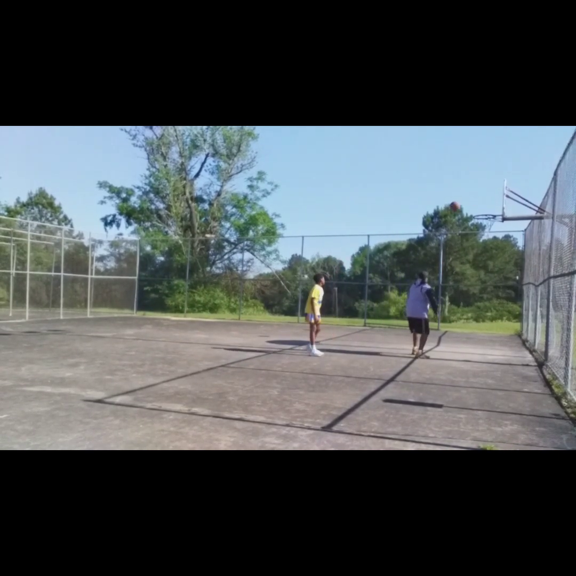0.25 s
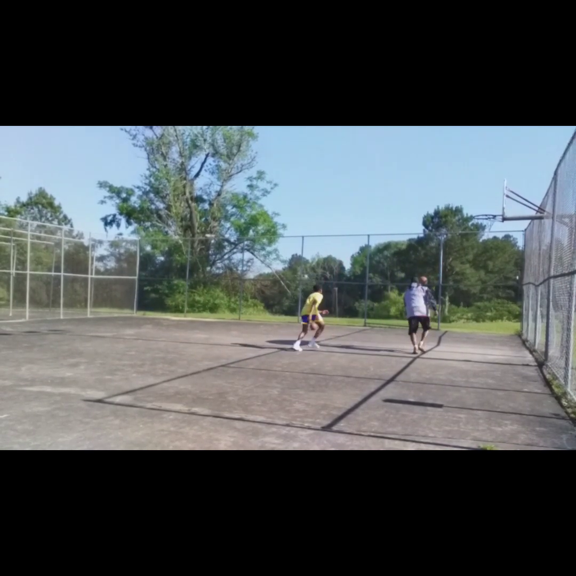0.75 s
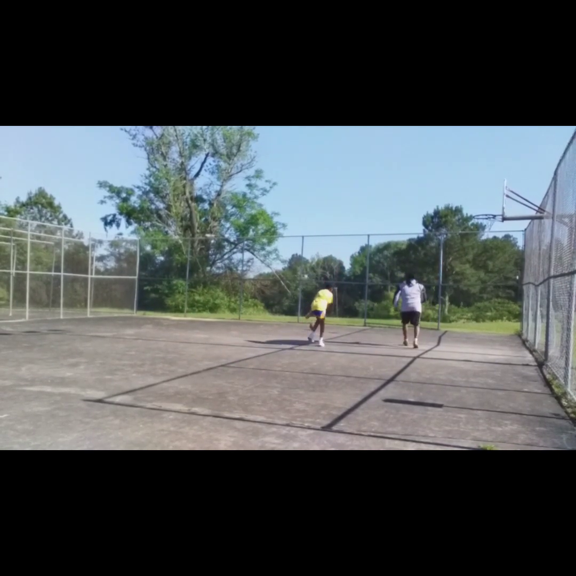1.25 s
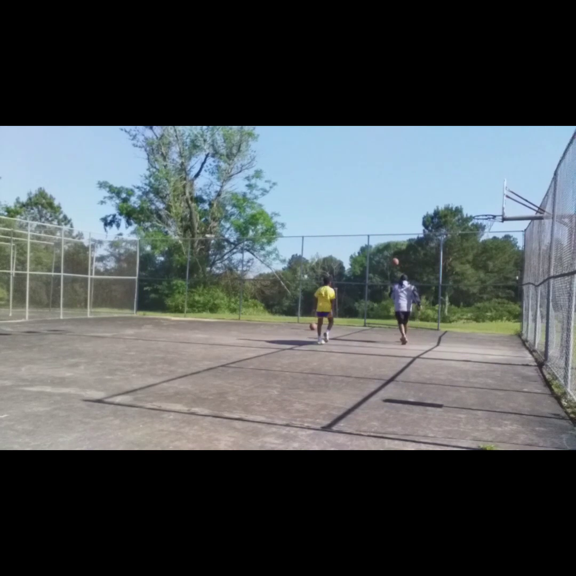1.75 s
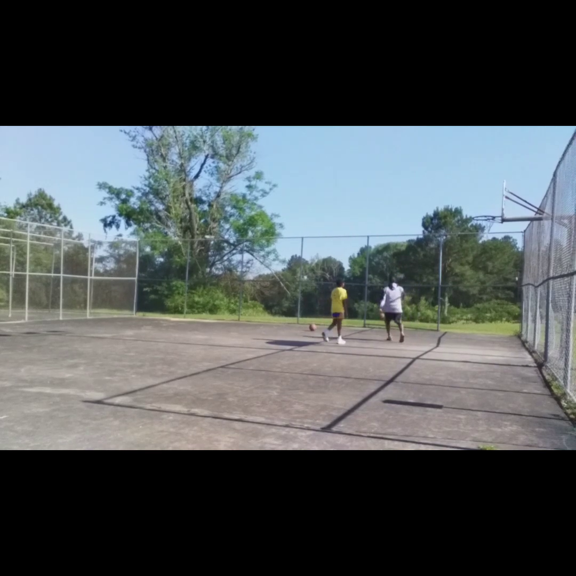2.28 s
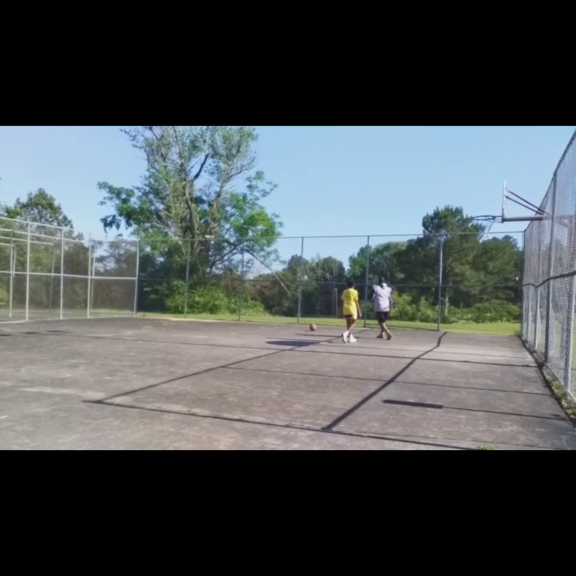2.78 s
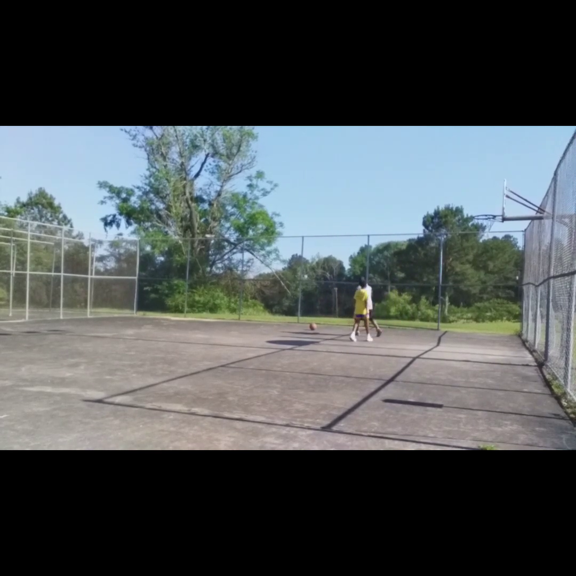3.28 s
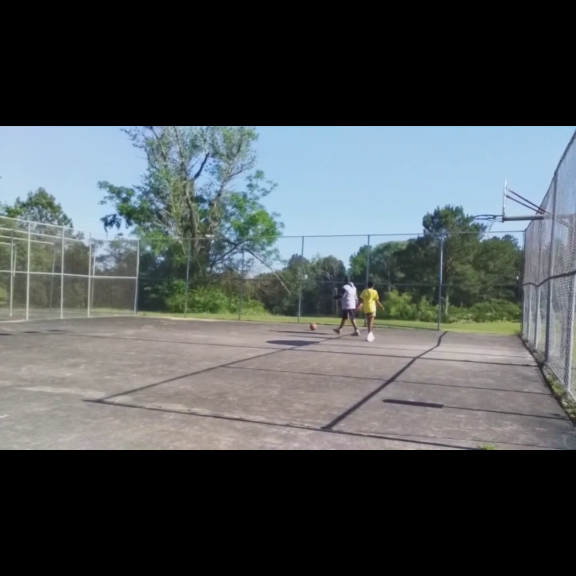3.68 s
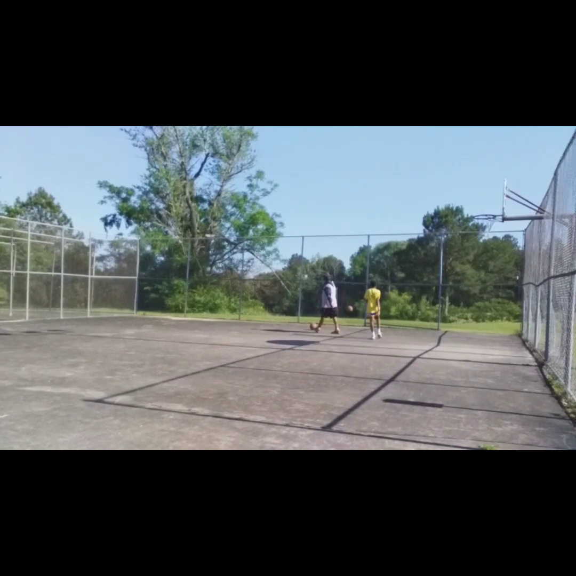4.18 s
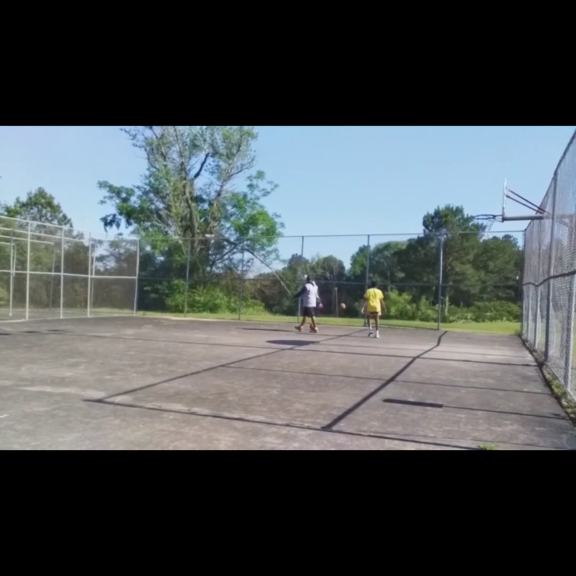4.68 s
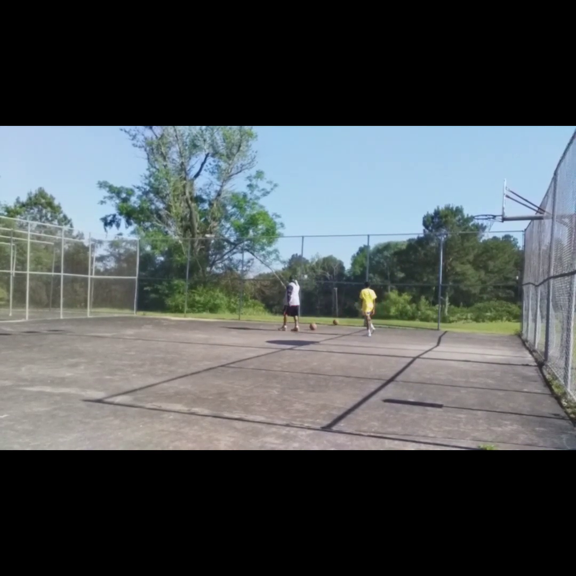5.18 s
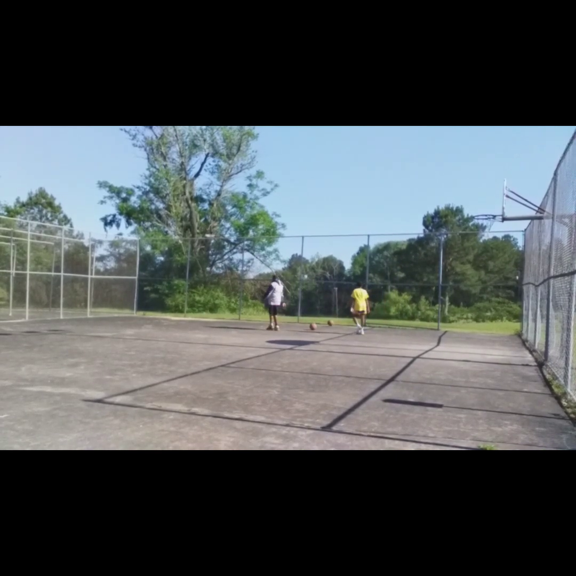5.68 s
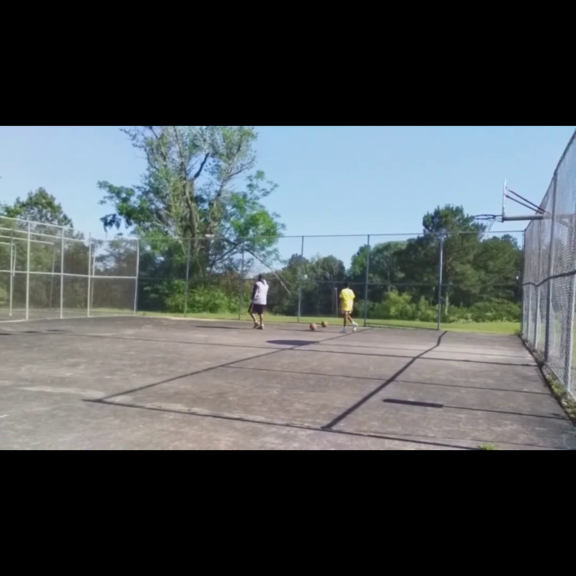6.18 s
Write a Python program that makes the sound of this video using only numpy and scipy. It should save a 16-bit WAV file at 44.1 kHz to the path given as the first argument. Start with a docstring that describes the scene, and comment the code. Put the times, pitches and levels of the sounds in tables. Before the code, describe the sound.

A distant microphone on an open court picks up light wind rumble and a fading rim hum. Sneakers grind sand briefly, then a basketball slaps concrete hard, with a quick echo and a faint shiver of wire fence. Strong wind thuds cover the middle, where three weaker bounces sound, the last the dullest. Quiet bird whistles and chirps close the scene.

```python
"""Basketballs bounce and sneakers scuff grit on an outdoor concrete court, under gusts and distant whistles.
Impacts excite the damped modes of ball, hoop and wire fence; soles release trains of tiny random cracks.
Wind is coloured noise plus a stream of eddies passing the microphone; birds are gliding pure tones.
A hard surface returns one slap echo of balls and soles, and diffuse scatter adds a faint tail."""
import sys
import numpy as np
from scipy import signal
from scipy.fft import rfft, irfft, next_fast_len
from scipy.io import wavfile

SR = 44100
rng = np.random.default_rng(int(sys.argv[2]) if len(sys.argv) > 2 else 0)


def master(y):
    """Save y as 16-bit WAV."""
    cut = np.clip(np.atleast_2d(y).T, -1, 1)
    pcm = np.round(cut * 32767)  # scale
    wavfile.write(sys.argv[1], SR, pcm.astype(np.int16))


N = 283861


def balls():
    """Impact excitation: a short contact force sets the shell and the enclosed air into damped modes."""
    # bounces; relative levels of each part: [start_s, smack_db, thump_db, grit_tick_db, early_db, echo_db]
    bounce_rows = [(1.068, -22.5, -33.5, -37, -14, -34), (1.1078, -11, -17.5, -16, -14.5, -4.5),
                   (2.4911, -20.5, -21, -23.5, -12, -4.5), (3.6159, -25.5, -27, -43.5, -4, -2.5),
                   (4.4901, -31, -27, -31.5, -15, -7.5)]
    # air and shell modes of the ball: [frequency_hz, level_db, t60_s]
    ball_modes = [(324.3, -13.5, 0.069), (398, -13.5, 0.093), (800, -8, 0.033), (921, -11, 0.042),
                  (1157, -16.5, 0.035), (1454, -32, 0.047), (1800, -31, 0.049), (2010, -16, 0.014),
                  (2750, -21, 0.019), (3790, -19.5, 0.021)]
    # colour of rubber slapping concrete: [frequency_hz, level_db]
    smack_colour = [(100, -12), (550, 3), (1000, 16.5), (2000, 3), (3300, -9.5), (4300, -38.5),
                    (6000, -17.5), (10000, -14.5), (16000, -31)]
    # colour of the grit under the ball: [frequency_hz, level_db]
    tick_colour = [(300, -75), (3000, -51), (6500, -2), (8800, 5.5), (10000, 15), (11500, 11.5),
                   (13500, -8), (16000, -18.5)]
    # colour of the scatter that follows a bounce: [frequency_hz, level_db]
    scatter_colour = [(100, -29.5), (250, -4.5), (600, -1.5), (1000, -1.5), (2000, -3.5), (2900, -10.5),
                      (4000, 0.5), (10000, -1), (15000, -13.5)]
    shell_t60_s, thump_t60_s, thump_hz = 0.028, 0.034, 136

    t = np.arange(SR // 4) / SR
    smack, tick = click(smack_colour), click(tick_colour)
    direct, thrown = np.zeros(N), np.zeros(N)
    for s, smack_db, thump_db, tick_db, early_db, echo_db in bounce_rows:
        detune = 1 + 0.039 * rng.standard_normal(len(ball_modes))
        tilt_db = 0.33 * (smack_db + 17)  # per octave: soft blows wake the high modes less
        ring = np.zeros(len(t))
        for (hz, db, t60), factor in zip(ball_modes, detune):
            start_db = smack_db - 9 + db + tilt_db * np.log2(hz / 1000)
            ring += amp(start_db - 60 * t / t60) * np.sin(2 * np.pi * hz * factor * t)

        # the shell's many close modes merge into a short noise
        shell, grit = rng.standard_normal((2, len(t)))
        ring += through(shell * amp(smack_db - 14 - 60 * t / shell_t60_s), smack)

        grit_decay = np.exp(-t / 0.0012) + 0.13 * np.exp(-t / 0.0091)
        ring += amp(tick_db - 13) * through(grit * grit_decay, tick)

        swell = 1 - np.exp(-t / 0.0015)  # the shell flattens, then springs back
        thump = amp(thump_db + 9 - 60 * t / thump_t60_s) * np.sin(2 * np.pi * thump_hz * t)
        ring += swell * thump

        contact = t / (0.00006 * amp(-0.6 * (smack_db + 8.5)))  # harder blows make a shorter spike
        hit = -amp(smack_db - 3.5) * contact * np.exp(1 - contact)
        add(hit, 0, -amp(smack_db + 0.5) * smack)
        add(hit, 0.0003, ring)

        add(direct, s, hit)
        add(direct, s + rng.uniform(0.0085, 0.009), amp(early_db) * hit)  # early reflection
        add(thrown, s, amp(echo_db) * hit)

    high_pass = signal.butter(2, 70, "high", fs=SR, output="sos")
    both = signal.sosfilt(high_pass, direct + slap(thrown))
    scattered = through(both, click(scatter_colour))
    return both + amp(-12) * surroundings(scattered, t60=0.35, treble_t60=0.42, build_s=0.016)


def sneakers():
    """Stick-slip friction: soles drag sand in dense tiny cracks, with a coarser scrape under weight."""
    # shoe scuffs; heavy_db is the heavy scrape relative to the sand: [start_s, length_s, level_db, heavy_db]
    scuff_rows = [(-.02, 0.039, -58.5, -18), (.522, .075, -65, 2), (0.691, .02, -39, -0.5),
                  (.742, 0.015, -53, 2), (0.786, 0.064, -25, 3.5), (0.981, 0.043, -42, -2.5),
                  (1.023, 0.049, -51.5, -1), (1.199, 0.009, -39.5, -3.5), (1.226, 0.019, -37, -10),
                  (1.358, 0.045, -50, 6), (1.391, .039, -38, -3.5), (1.844, .006, -63.5, 3.5),
                  (1.869, 0.058, -68, 0), (2.226, 0.025, -54.5, -0.5), (2.286, 0.019, -46, -15),
                  (2.5, 0.006, -54, 0), (2.703, 0.051, -58, -7), (3.275, 0.018, -56.5, -7),
                  (3.81, .11, -71.5, 5.5), (4.404, 0.031, -66, -4), (4.492, 0.082, -62, -10),
                  (4.907, 0.051, -65.5, -10), (5.17, 0.11, -60.5, -4), (5.29, 0.042, -66.5, -4),
                  (5.367, 0.14, -66.5, 1)]
    # colour of sand hissing under a sole: [frequency_hz, level_db]
    sand_colour = [(500, -23), (4000, -25.5), (8000, -12), (9000, -7), (9900, 5), (11200, 4), (12400, -6.5),
                   (13800, -16.5), (15500, -22)]
    # colour of a loaded sole's scrape: [frequency_hz, level_db]
    scrape_colour = [(150, -18.5), (800, -17), (1300, -7), (1800, 0.5), (2300, -3), (3050, 1),
                     (3550, -10.5), (4300, -3), (7000, -6.5), (10000, 2.5), (12400, 5.5), (14000, 1.5),
                     (16000, -8)]
    rise_share, trail_share = 0.27, 0.61  # attack, and a light sole's added release, as shares of length
    stop_s = 0.0036  # release of a planted sole
    planted_db, light_db = -48, -59.5  # above the first soles stop dead; below the second they trail off
    cracks_per_s = 16000

    t = np.arange(N) / SR
    light, heavy = np.zeros(N), np.zeros(N)
    for s, length, db, heavy_db in scuff_rows:
        lightness = np.clip((planted_db - db) / (planted_db - light_db), 0, 1)
        fade = stop_s + trail_share * length * lightness
        stroke = amp(db) * envelope(s, length, rise_share * length, fade)
        weight = np.clip((t - s) / (0.62 * length), 0, 1)  # weight comes on gradually
        light += stroke
        heavy += stroke * amp(heavy_db) * weight

    cracks = rng.standard_normal((2, N)) * (rng.random((2, N)) < cracks_per_s / SR)
    cracks *= amp(1.8 * np.minimum(rng.exponential(1, (2, N)), 4))  # a few cracks are much larger
    sand = through(light * unit(cracks[0]), click(sand_colour))
    scrape = through(heavy * unit(cracks[1]), click(scrape_colour))
    catch = amp(2.3 * drift(180))  # the sole grips and slips
    dry = catch * amp(-3) * (sand + scrape)
    tail = surroundings(dry, t60=0.33, treble_t60=0.25, build_s=0.0065)
    return dry + amp(-13.5) * slap(dry) + amp(-12.5) * tail


def fence(x, t60=0.45, rattle_db=3):
    """Sympathetic resonance: incoming sound sets the chain-link wires ringing in a few loose bands."""
    # resonance bands of the wires: [centre_hz, width_hz, level_db]
    wire_bands = [(1950, 343, -31), (2450, 250, -23), (2860, 140, -16)]
    t = np.arange(SR // 2) / SR
    hz = np.fft.rfftfreq(len(t), 1 / SR)
    bands = sum(amp(db) * np.exp(-((hz - centre) / width) ** 2) for centre, width, db in wire_bands)
    rattle = amp(rattle_db * drift(40)[:len(t)])  # loose wires knock in clusters
    build_up = 1 - np.exp(-t / 0.037)
    shiver = rattle * rng.standard_normal(len(t)) * amp(-60 * t / t60) * build_up
    response = irfft(rfft(shiver / np.linalg.norm(shiver)) * bands, len(t))
    return through(x, response)


def wind(count=1200, eddy_hz=92, size_spread_db=4.0):
    """Turbulent pressure: a rumble and a stream of eddies that pass faster, so brighter, as wind rises."""
    # colour of the breeze's rumble: [frequency_hz, level_db]
    breeze_colour = [(20, -25.5), (40, -29), (60, 1), (95, 4.5), (135, 0.5), (200, -16.5), (300, -15.5),
                     (500, -55), (1000, -47.5), (3000, -99)]
    # colour of the fine turbulence in strong gusts: [frequency_hz, level_db]
    gust_colour = [(100, -7.5), (250, 2), (400, -2), (600, -15), (800, -28), (1200, -55), (3000, -64)]
    # single strong eddies at the microphone, relative level: [centre_s, level_db, frequency_hz]
    buffet_rows = [(.191, -22.5, 93), (0.259, -13, 133.6), (0.401, -23, 173), (.503, -25, 94),
                   (.562, -30, 180), (2.061, -17.5, 189), (2.231, -17.5, 169), (2.311, -14, 129),
                   (2.522, -14.5, 148), (2.625, -16, 140), (2.666, -15.5, 170), (2.846, -19.5, 115),
                   (2.89, -20.5, 217), (3.347, -21, 161), (3.478, -24.5, 104), (3.506, -10.5, 176),
                   (3.949, -13, 162.3), (4.007, -12.5, 140), (4.079, -21.5, 98), (4.261, -16, 111.6),
                   (4.433, -22.5, 136.6), (4.702, -19.5, 97), (4.779, -18.5, 181), (5.411, -25.5, 118.3),
                   (5.624, -22.5, 91)]
    half_s = 1 / 20  # an eddy's centre lies this far into its waveform

    level_db = wind_strength()
    out = noise(breeze_colour) * amp(level_db - 2.5 + 2.6 * drift(21))

    # fine turbulence grows faster than the rumble, up to a ceiling
    fine_db = -46.5 + 2.02 * (np.minimum(level_db, -30) + 31.5)
    out += noise(gust_colour) * amp(fine_db + 6.1 * np.tanh(drift(29)))

    lumps_db = 2.2 * np.tanh(drift(10)) - 0.6  # eddies come in clusters
    for place, turn, size, speed in rng.random((count, 4)):
        s = place * N / SR
        db = level_db[int(place * N)] + lumps_db[int(place * N)]
        hz = eddy_hz * np.exp(0.027 * (db + 42) + 0.4 * (speed - 0.5))
        gain = amp(db - 0.5 - size_spread_db * np.log(size + 0.049))
        add(out, s - half_s, gain * eddy(hz, turn, sharpness=3.62))

    turns = rng.random((len(buffet_rows), 2))
    for (s, db, hz), (turn, wake_turn) in zip(buffet_rows, turns):
        sharpness = max(5 - 0.067 * (db + 26.5), 1.5)  # strong eddies have tighter cores
        add(out, s - half_s, amp(db + 1.45) * eddy(hz, turn, sharpness))
        wake = eddy(0.7 * hz, wake_turn, sharpness=3.45)  # a slower eddy follows
        add(out, s + 0.01138 - half_s, amp(db - 3.5) * wake)
    high_pass = signal.butter(4, 50, "high", fs=SR, output="sos")
    return signal.sosfilt(high_pass, out)


def wind_strength():
    """Power addition: gusts rise and drop over a steady light breeze; returns the wind's level in dB."""
    # gusts on the microphone: [start_s, length_s, level_db]
    gust_rows = [(0, 0.29, -40), (0.351, 0.24, -39), (1.665, .27, -43.5), (1.921, 0.23, -35.5),
                 (2.121, 0.6, -28.5), (2.738, 0.23, -33), (3, 0.413, -36), (3.428, 0.2, -33.5),
                 (3.793, 1.203, -42), (3.922, 0.12, -28), (4.114, .15, -35.5), (4.709, 0.1, -33.5),
                 (5.36, 0.27, -48)]
    calm_db, rise_s, fall_s = -50.5, 0.037, 0.021
    arch_db = -2  # negative: each gust sags in its middle
    t = np.arange(N) / SR
    power = amp(calm_db) ** 2
    for s, length, db in gust_rows:
        arch = np.sin(np.pi * np.clip((t - s) / length, 0, 1)) - 0.5
        power = power + (amp(db + arch_db * arch) * envelope(s, length, rise_s, fall_s)) ** 2
    return 10 * np.log10(power)


def eddy(hz, turn, sharpness):
    """Vortex advection: the pressure swing of one passing eddy, strongest at hz and centred in 0.1 s."""
    t = np.arange(-SR // 20, SR // 20) / SR
    angle = np.arctan(2 * np.pi * hz * t / sharpness)
    return np.cos(2 * np.pi * turn + (sharpness + 1) * angle) * np.cos(angle) ** (sharpness + 1)


def birds(count=4):
    """Frequency-modulated pure tones: echoed whistles and single chirps, smeared by the foliage."""
    # phrases of even whistles: [first_whistle_s, pitch_hz, level_db]
    phrase_rows = [(0.051, 2558, -54.5), (2.574, 2578, -54), (5.271, 2524, -61.5)]
    # shape of one whistle, timed from its peak: [offset_s, pitch_factor, level_db]
    whistle_shape = [(-.062, .983, -17), (-.035, .994, -7.5), (0, 1, -1), (.022, .966, -3.5),
                     (.044, .915, -18)]
    # single chirps of other birds: [start_s, length_s, first_hz, last_hz, level_db]
    chirp_rows = [(0.212, 0.3, 1297, 1285, -64), (.25, 0.37, 8130, 8400, -73.5),
                  (1.233, 0.092, 9300, 6750, -63), (3.924, 0.084, 8000, 8130, -72),
                  (5.05, 0.091, 8000, 8160, -70), (6.083, .12, 3950, 1800, -71),
                  (6.163, 0.12, 1340, 1275, -55), (6.389, .075, 3660, 2470, -60.5)]
    every_s, sag_hz_per_s = 0.192, 25  # whistle spacing; the pitch sinks through a phrase
    lead_s, lead_db = 0.125, -12.5  # a soft note opens each phrase
    echo_s, echo_db = 0.066, -5.5

    song = np.zeros(N)
    notes = [(-lead_s, lead_db)] + [(k * every_s, 0) for k in range(count)]
    for start, pitch_hz, db in phrase_rows:
        for after, accent_db in notes:
            hz = pitch_hz - sag_hz_per_s * after
            rows = [(at, hz * factor, level) for at, factor, level in whistle_shape]
            note = amp(db + accent_db) * whistle(rows)
            onset = start + after + whistle_shape[0][0]
            add(song, onset, note)
            add(song, onset + echo_s, amp(echo_db) * note)
    for s, length, first_hz, last_hz, db in chirp_rows:
        add(song, s, amp(db) * chirp(length, first_hz, last_hz))
    dry = song * (1 + 0.29 * drift(69.06))  # moving air makes far sounds flutter
    return amp(-1) * dry + amp(-8) * surroundings(dry, t60=0.26, treble_t60=0.265, build_s=0.0047)


def whistle(rows):
    """Phase integration: a pure tone glides along its pitch and level points."""
    s, hz, db = np.transpose(rows)
    t = np.arange(s[0], s[-1], 1 / SR)
    tone = np.sin(2 * np.pi * np.cumsum(np.interp(t, s, hz)) / SR)
    return amp(np.interp(t, s, db)) * tone * signal.windows.tukey(len(t), 0.2)


def chirp(length, first_hz, last_hz):
    """Linear frequency sweep: a pure tone swells and fades during one straight glide."""
    hz = np.linspace(first_hz, last_hz, round(length * SR))
    return np.hanning(len(hz)) * np.sin(2 * np.pi * np.cumsum(hz) / SR)


def hoop():
    """Modal decay: rim and backboard ring on after a shot, each mode dying at its own rate."""
    # modes of hoop and backboard, relative level: [frequency_hz, level_db, t60_s]
    hoop_modes = [(483.5, -56.5, 2.14), (587, -56.5, 1.624), (706, -68, 0.873), (1040, -60, 0.78),
                  (1098, -61.5, 1.13), (1226, -63.5, 0.92)]
    # colour of the clatter around them: [frequency_hz, level_db]
    clatter_colour = [(200, -23.5), (520, 5.5), (1000, -3.5), (1450, -7), (2000, -22), (4000, -33),
                      (9000, -58.5)]
    t = np.arange(N) / SR
    ring = np.zeros(N)
    for hz, db, t60 in hoop_modes:
        ring += amp(db - 60 * t / t60) * np.sin(2 * np.pi * (hz * t + rng.random()))
    clatter = noise(clatter_colour) * amp(-52.5 - 60 * t / 2)
    return amp(-2) * ring * amp(4.7 * drift(15.7)) + clatter


def air():
    """Stationary broadband noise: the faint, nearly even hiss of the open air."""
    # colour of distant outdoor air: [frequency_hz, level_db]
    air_colour = [(180, -20), (300, -5.5), (391, -2.5), (453, -2.5), (835, -8), (953, -9.5), (1030, -10.5),
                  (1350, -12.5), (1700, -16), (3340, -15.5), (7020, -24), (9140, -20.5), (10100, -14.5),
                  (15500, -28)]
    return noise(air_colour) * amp(-67 + 0.5 * drift(3.6))


def slap(x):
    """Specular reflection: one duller echo from a hard surface about seven metres off."""
    echo = np.zeros(N)
    add(echo, 0.0397, signal.lfilter([0.6], [1, -0.4], x))  # delay in seconds
    return echo


def surroundings(x, t60, treble_t60, build_s):
    """Diffuse reverberation: scatter from fence and trees, with a decay time that varies with pitch."""
    hz, t, z = signal.stft(rng.standard_normal(SR), SR, nperseg=256)
    decay_s = read([(1500, t60), (11000, treble_t60)], hz)[:, None]
    shaped = z * amp(-60 * t / decay_s) * (1 - np.exp(-t / build_s))
    tail = signal.istft(shaped, SR, nperseg=256)[1]
    return through(x, tail / np.linalg.norm(tail))


def envelope(s, length, rise, fade):
    """Amplitude envelope: attack from time s, hold until length is over, then exponential release."""
    t = np.arange(N) / SR - s
    return np.clip(t / rise, 0, 1) ** 2 * np.exp(-np.clip((t - length) / fade, 0, 20))


def noise(points):
    """Spectral shaping: steady random noise of a given colour, rms 1."""
    size = next_fast_len(N, True)
    gain = amp(read(points, np.fft.rfftfreq(size, 1 / SR)))
    return unit(irfft(rfft(rng.standard_normal(size)) * gain, size)[:N])


def click(points, size=4096):
    """Minimum phase: the causal pulse of a given colour, energy 1."""
    log_gain = np.log(amp(read(points, abs(np.fft.fftfreq(size, 1 / SR)))))
    spectrum = np.exp(np.conj(signal.hilbert(log_gain)))
    pulse = np.fft.ifft(spectrum).real[:size // 2]
    return pulse / np.linalg.norm(pulse)


def drift(rate_hz, order=64):
    """Low-pass random modulation: a slow wander of rms 1, drawn once every `order` samples."""
    size = next_fast_len(N // order + 2, True)
    low_pass = np.exp(-(np.fft.rfftfreq(size, order / SR) / rate_hz) ** 2)
    slow = irfft(rfft(rng.standard_normal(size)) * low_pass, size)
    return unit(np.interp(np.arange(N) / order, np.arange(size), slow))


def through(x, response):
    """Linear filtering: convolves with an impulse response and keeps the length."""
    return signal.oaconvolve(x, response)[:len(x)]


def read(points, hz):
    """Logarithmic pitch scale: reads a spectrum between its points on a log-frequency axis."""
    f, value = np.transpose(points)
    return np.interp(np.log(hz + 1), np.log(f + 1), value)


def add(mix, s, sound):
    """Superposition: mixes a sound in at time s, cut at the edges."""
    start = round(s * SR)
    sound = sound[max(-start, 0):]
    part = mix[max(start, 0):][:len(sound)]
    part += sound[:len(part)]


def amp(db):
    """Decibel law: level to amplitude gain."""
    return 10 ** (np.asarray(db) / 20)


def unit(x):
    """Power normalisation: scales to rms 1."""
    return x / np.sqrt(np.mean(x ** 2) + 1e-20)


def scene():
    """Superposition: all sources add at one microphone."""
    bounces, scuffs = balls(), sneakers()
    mesh = fence(amp(15.5) * bounces + amp(-7.5) * scuffs)
    return (bounces + scuffs + mesh + wind() + birds() + hoop() + air())[None]


def record(dry):
    """Band limitation: the recorder passes only what lies below its upper edge."""
    edge_hz = 15800
    low_pass = signal.firwin(511, edge_hz, window=("kaiser", 9), fs=SR)
    return signal.oaconvolve(dry, low_pass[None], "same")


dry = scene()
out = record(dry)
master(out)
```